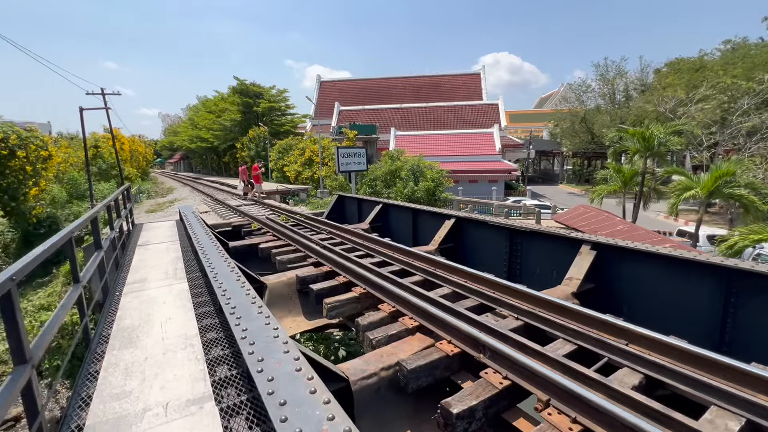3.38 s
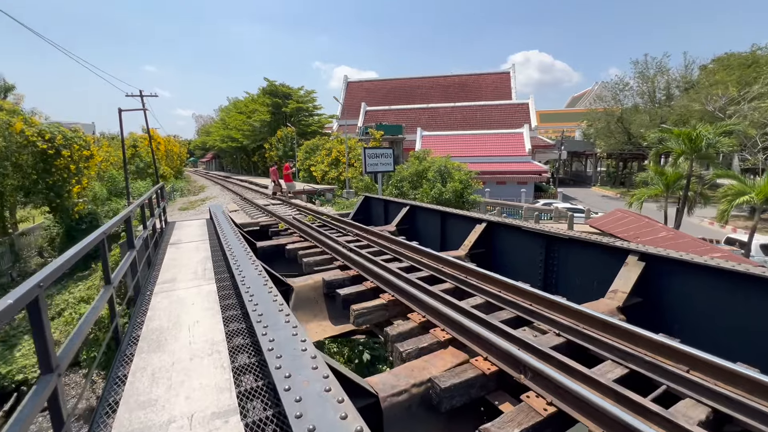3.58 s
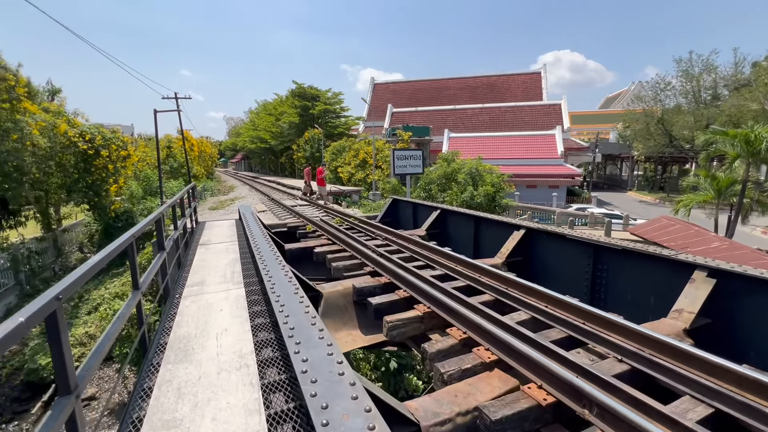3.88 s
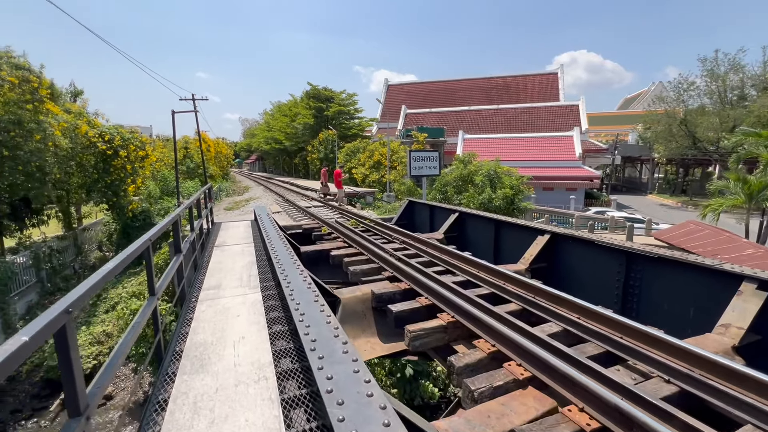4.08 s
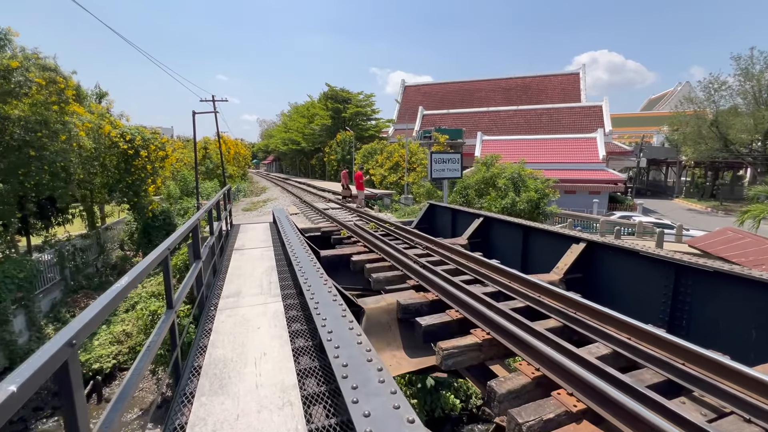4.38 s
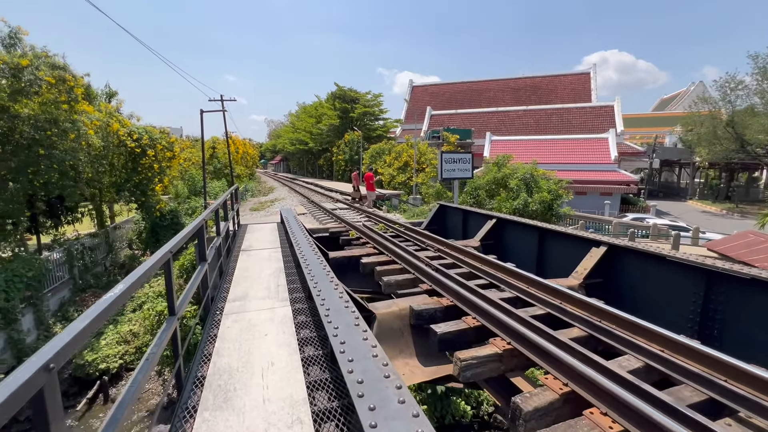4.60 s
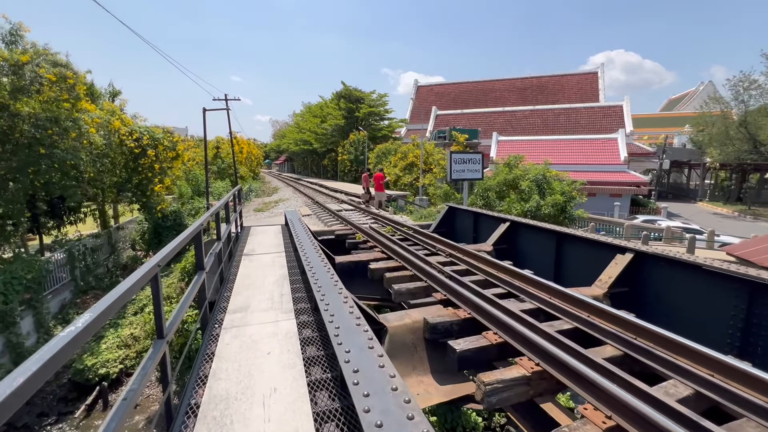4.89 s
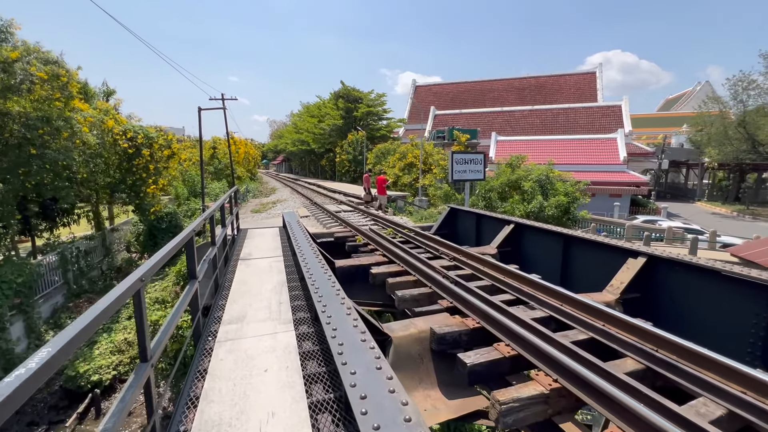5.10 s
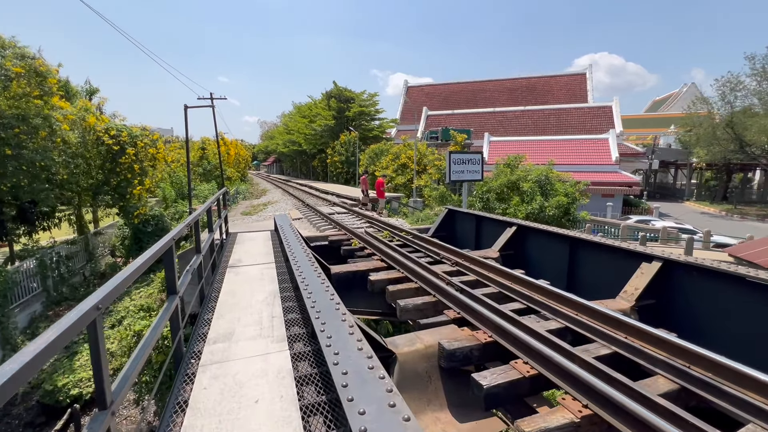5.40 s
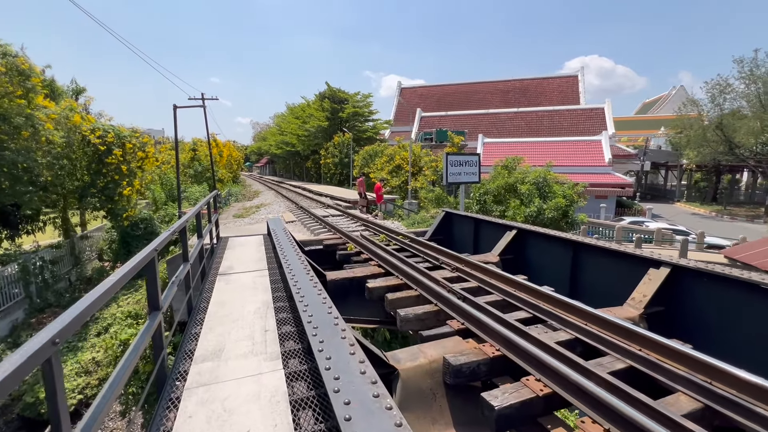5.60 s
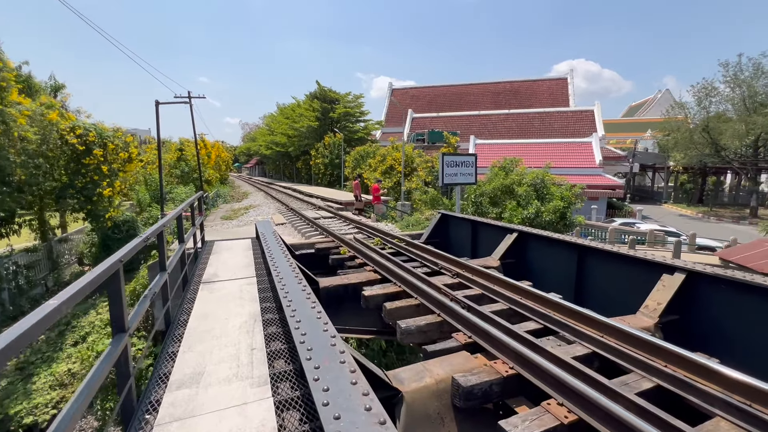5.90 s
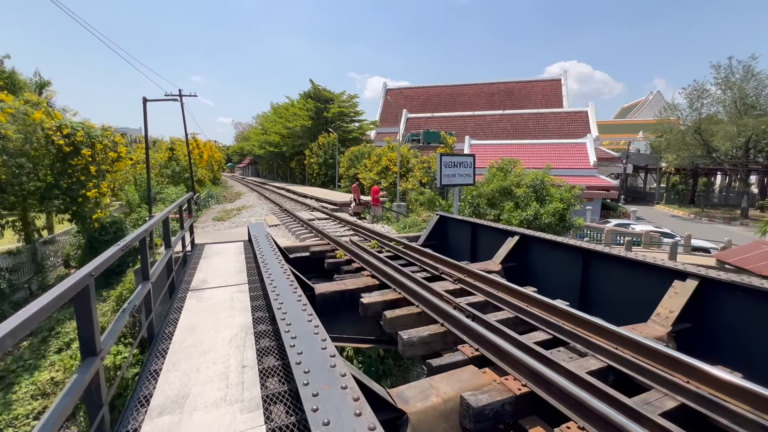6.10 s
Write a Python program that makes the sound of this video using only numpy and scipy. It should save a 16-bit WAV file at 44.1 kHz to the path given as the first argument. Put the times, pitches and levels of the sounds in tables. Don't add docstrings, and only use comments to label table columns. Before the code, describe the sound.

Outdoors on a steel railway bridge over a canal, the sound starts at full strength: a boat with an open exhaust passes right below, closest at about 0.2 s. Its steady low drone, near 84 firings a second, sits under a ragged, throbbing roar with bright spray. From 0.2 to 0.7 s the deck buzzes in a quick dry metallic rattle, strongest near 0.45 s. The boat then draws away, losing treble and level, its drone wavering but barely changing pitch. A grainy midrange echo blooms off the water around 0.8 s and again later. A hard hull slap lands at 1.5 s, softer ones at 2.6 and 3.3 s, with wash swelling around 2.2 s. A tiny sharp crack on the left comes at 4.8 s; faint grit ticks and a last splash come near 6 s. Town rumble and thin insect hiss stay behind. Close stereo, compact microphones.

```python
import sys
import numpy as np
from scipy import signal
from scipy.fft import rfft, irfft, next_fast_len
from scipy.io import wavfile

SR = 44100
rng = np.random.default_rng(int(sys.argv[2]) if len(sys.argv) > 2 else 0)


def gain_from_decibels(decibels):
    exponent = np.asarray(decibels, float) / 20
    return 10 ** exponent


def transcribe(u):
    v = np.clip(np.atleast_2d(u).T, -1, 1)
    q = np.round(v * 32767).astype(np.int16)
    wavfile.write(sys.argv[1], SR, q)


N = 275625
TIME = np.arange(N) / SR
PADDED = next_fast_len(N + 4096)
HZ = np.maximum(np.arange(PADDED // 2 + 1) * SR / PADDED, 1)

# frequency in Hz, boat in dB per Hz, surroundings in dB per Hz.
COLOUR_ROWS = [(32, -70, -80), (45.7, -43.5, -43.5), (110, -40.5, -44), (190, -40, -58), (291, -47, -60),
               (442, -52.5, -69), (664, -59, -65.5), (850, -60, -62), (1320, -61, -63.5),
               (2030, -62.5, -71.5), (3700, -69, -74.5), (6200, -67, -73), (7530, -69.5, -80),
               (11000, -65.5, -94.5), (15800, -70.5, -104)]
# frequency in Hz, lead in half turns, boat level in dB,
# boat likeness 0-1, surroundings level in dB, surroundings likeness 0-1.
PORT_ROWS = [(40, 0.024, -3.5, 0.84, -9.5, 0.06), (235, 0.29, -3.5, 0.98, -1.5, 0.77),
             (422, 0.54, -6, 0.84, 1.5, 0.99), (575, 0.92, -2, 0.32, 5, 0.96),
             (722, 0.87, 4, 0.25, -0.5, 0.56), (1046, 0.75, 2.5, 0.36, -3.5, 1),
             (1590, 1.04, 0, 0.3, -1.5, 0.7), (2900, 2.2, -1.5, 0, -3, 0.8),
             (4320, 2.96, -3.5, 0.13, -9, 0.54), (6460, 5.1, -9.5, 0, -16.5, 0.26),
             (8830, 5.83, 3.5, 0.12, -24, 0.8), (10240, 7.13, -1.5, 0.94, 4, 0.4),
             (11600, 8.33, -0.3, 1, -3, 0.9), (13850, 7.3, -5, 0.95, 5, .98),
             (15700, 10.0, 4, .98, 11, .98)]


def crank_angle():
    # time in seconds, firing rate in Hz.
    speed = [
        (0.0, 86.3),
        (0.1, 82.7),
        (0.61, 83.98),
        (1.08, 83.88),
        (1.2, 82.7),
        (1.65, 82.7),
        (1.78, 84.22),
        (6.25, 83.98),
    ]
    firing_hz, = in_time(speed)
    return np.pi * np.cumsum(firing_hz) / SR


def passage():
    closest_s, closest_m, boat_m_per_s = 0.23, 6.22, 7.3
    metres = np.hypot(closest_m, boat_m_per_s * (TIME - closest_s))
    return metres - closest_m, 20 * np.log10(metres / closest_m)


def order_levels(loss_db):
    # level at the closest point in dB, share of the spreading loss, flutter in dB.
    orders = [
        (-28, 0.36, -0.8),
        (-18, .45, 1.12),
        (-21, 0.48, 1.7),
        (-23.5, 0.47, 1.4),
    ]
    # time in seconds, half length in seconds, dB.
    fades = [
        [(0.1, .25, -4), (1.42, 0.15, -5), (2.3, .3, -3), (3.2, .3, -1), (4.35, .15, -4), (4.8, .06, -14),
         (5.6, .9, -6)],
        [(.1, 0.13, -2.5), (1.22, 0.15, -3), (1.6, 0.14, 3), (2.5, 0.19, 3.5), (3.3, 0.28, -2),
         (4.35, .25, 3.5), (5.26, 0.086, -8.5), (5.45, 0.048, -8), (5.83, 0.045, -5), (6.14, .04, -3)],
        [(.08, 0.12, -10), (.55, 0.25, 3), (.98, 0.091, -16), (1.2, 0.047, 5), (1.65, .27, -17),
         (2.2, 0.12, -16), (2.6, 0.21, -7), (3.05, 0.18, -3.5), (3.38, 0.061, -6), (3.7, .15, 3),
         (4.2, .07, -7), (4.7, 0.37, -15), (6.02, 0.15, 4), (6.25, .05, -16)],
        [(.08, 0.035, -3), (.3, 0.14, 5), (1.62, .12, 2.5), (2.03, 0.13, -6.5), (2.7, 0.28, -6),
         (3.25, 0.14, -12), (4.45, 0.18, -18), (5.6, .06, -5), (5.95, 0.15, -12)],
    ]
    flutter_per_s = 6.3
    return [db - share * loss_db + bumps(rows) + flutter_db * drift(flutter_per_s)
            for (db, share, flutter_db), rows in zip(orders, fades)]


def drone(crank, levels_db, exhaust_db, under):
    order_lag = [(2.4, 0, .25), (0, 0, 0), (0, -2.8, .5), (-.3, 2.8, .45)]
    # multiple of crank rate, level against the exhaust roar in dB.
    upper = [(1.5, -22), (2.5, -32), (3.5, -10.5), (5, -13.5), (6, -15.5), (6.5, -12.5), (9, -16)]
    out = 0
    for order, level_db in enumerate(levels_db, 1):
        open_lag, bridge_lag, wander = order_lag[order - 1]
        lag = open_lag + bridge_lag * under ** 2 + wander * drift(.6)
        out = out + gain_from_decibels(level_db + 0.95) * np.cos(order * crank - lag)
    for order, level_db in upper:
        level = gain_from_decibels(exhaust_db + level_db + 2.6 * drift(7.0))
        out = out + level * np.cos(order * crank + 1.64 * drift(1.22))
    shaft = 1 + 0.039 * np.cos(crank / 4)
    return gain_from_decibels(-0.5) * np.sqrt(2) * out * shaft


def roar_levels(metres, loss_db):
    # level at the closest point in dB, share of the spreading loss, air loss in dB per m,
    # share of surges.
    layers = [
        (-19.5, 0.84, 0.17, 1.0),
        (-25, 0.86, 0.17, 0.37),
        (-32, 0.65, 0.13, 0.39),
        (-37, 1, 0.12, 0.43),
    ]
    # time in seconds, half length in seconds, dB.
    surges = [(.01, 0.016, 4), (.07, .025, -1), (.12, 0.015, 2.5), (.17, 0.024, -0.5), (.27, 0.023, -3),
              (.36, 0.022, 4.5), (.43, .015, 3), (.52, 0.073, 0.5), (.67, 0.026, -1), (.95, 0.028, -0.5),
              (1.15, .3, -1.5), (1.55, .05, 2), (1.78, 0.067, 1.5), (2.9, 0.7, 1.5), (2.73, 0.02, -4),
              (2.97, 0.063, 2), (3.35, .12, 0), (4.58, 0.035, 2.5), (5.3, 0.56, -3.5), (6.1, 0.12, 3)]
    # time in seconds, half length in seconds, dB.
    breakers = [
        (.98, 0.051, 2),
        (1.7, 0.052, 3.5),
        (2.2, 0.27, 4),
        (2.4, 0.47, 3.5),
        (3.3, 0.46, 0),
        (6.0, .02, 7),
        (6.2, 0.16, 4.5),
    ]
    breaker_shares = [0.0, .1, .6, 1.1]
    surge_db, breaker_db = bumps(surges), bumps(breakers)
    return [db - share * loss_db - air * metres + surging * surge_db + breaking * breaker_db
            for (db, share, air, surging), breaking in zip(layers, breaker_shares)]


def roar(crank, levels_db):
    # frequency in Hz, width in Hz, dB.
    body = [(281, 30, 1), (380, 30, 4), (506, 24, 3), (850, 57, 2.5), (1370, 170, 3.5), (2260, 110, 3),
            (3800, 350, 4)]
    splits_hz = [450, 3000, 9000]
    fired = np.diff(np.floor(crank / np.pi), prepend=0) > 0
    pulses = rng.standard_normal((2, N)) * fired * np.sqrt(SR / 84)
    white = rng.standard_normal((2, N))
    throb = 0.095 * np.cos(crank + 2.4)
    colour_db = in_pitch(COLOUR_ROWS)[0] + humps(body)
    together = drift(7.7)
    groups = np.zeros((4, 2, N))
    for (hz, hiss), (_, pulse) in zip(octave_parts(white, colour_db), octave_parts(pulses, colour_db)):
        share = np.clip(60 / hz, 0, .35)
        band = np.sqrt(share) * pulse + np.sqrt(1 - share) * hiss * (1 + throb * (hz > 400))
        gust_db = 0.18 * together + 1.54 * drift(3.3)
        groups[np.searchsorted(splits_hz, hz)] += band * gain_from_decibels(gust_db)
    offsets_db = [1.6, 0.72, 0.9, 1.2]
    return sum(gain_from_decibels(level + more) * rms_one(g) for g, level, more in zip(groups, levels_db, offsets_db))


def water_echo(crank, loss_db):
    # time in seconds, half length in seconds, dB.
    blooms = [(.08, .07, 4), (.24, 0.023, 6), (.6, .1, 0), (.79, 0.075, 11), (1.1, .2, -10),
              (1.72, 0.11, 3.5), (2.3, 0.77, 6), (3.1, 0.28, -20), (3.34, 0.039, 11), (3.85, .04, 4),
              (4.07, .1, -3), (4.6, 0.18, 1), (5.28, 0.2, 7), (5.7, 0.073, -14), (5.9, .06, 8.5)]
    echo_hz, climb_hz_per_s, wander_hz = 864, 1.5, 12
    echo_db, loss_share, flutter_db = -34.5, 0.65, 2.0
    centre_hz = echo_hz + climb_hz_per_s * TIME + wander_hz * drift(2.5)
    level_db = echo_db - loss_share * loss_db + bumps(blooms) + flutter_db * drift(15)
    phase = 2 * np.pi * np.cumsum(centre_hz) / SR
    band = drift(80) * np.cos(phase) + drift(80) * np.sin(phase)
    return gain_from_decibels(level_db - 7.0) * band * (1 + 0.2 * np.cos(crank + 2.7))


def hull_slaps():
    # time in seconds, peak in dB, frequency in Hz, t60 in seconds.
    slaps = [
        (1.523, -5, 211, 0.12),
        (1.545, -8.5, 273, 0.1),
        (2.569, -21, 102.1, .12),
        (3.343, -9.5, 110, 0.094),
        (3.335, -31, 776, .1),
        (3.81, -33, 692, 0.23),
        (3.835, -32.5, 850, 0.22),
    ]
    cushion = np.hanning(90) / 45
    out = np.zeros(N)
    for s, db, hz, t60 in slaps:
        click = clicks_at([s], db)
        if hz < 400:
            click = np.convolve(click, cushion)[:N]
        out += ring(click, hz, t60)
    return out


def rattle_hits(count=21):
    first_s, turn_s, jitter_s = .1894, .0237, 0.0016
    loudest_s, peak_db, rise_db_per_s, fall_db_per_s = 0.46, -11, 47, 95
    off_turn_db = -4
    turn = np.arange(count)
    s = first_s + turn_s * turn + jitter_s * rng.uniform(-0.92, 1, count)
    away_db = np.maximum(rise_db_per_s * (loudest_s - s), fall_db_per_s * (s - loudest_s))
    return np.transpose([s, peak_db - away_db + off_turn_db * (turn % 2)])


def deck_rattle():
    # frequency in Hz, level in dB, t60 in seconds.
    modes = [(3520, -25.5, 0.0059), (3820, -26, 0.018), (5900, -29, 0.032), (6670, -29, 0.024),
             (8280, -34, 0.019), (10140, -20.5, 0.012), (11620, -28, 0.015), (14200, -33, 0.01)]
    hits = rattle_hits()
    out = gain_from_decibels(-14) * burst(hits, .005, 3500)
    for hz, level_db, t60 in modes:
        uneven_db = rng.normal(0, 3.7, len(hits))
        scraped = hits + np.outer(level_db + uneven_db, [0, 1])
        out += ring(burst(scraped, 0.0026, 2500), hz, t60)
    return out


def grit_ticks():
    # time in seconds, peak in dB.
    ticks = [
        (5.995, -28),
        (6.003, -28),
        (6.015, -30),
        (6.054, -28),
    ]
    # frequency in Hz, width in Hz, dB.
    grit_tone = [(10800, 4500, 12.5)]
    return filtered(burst(ticks, 0.0019, 7000), gain_from_decibels(humps(grit_tone) - 14))


def deck_crack():
    # time in seconds, peak in dB.
    cracks = [
        (4.818, -25),
    ]
    return burst(cracks, .0012, 10550)


def surroundings():
    white = rng.standard_normal((2, N)) * np.sqrt(SR / 2)
    parts = octave_parts(white, in_pitch(COLOUR_ROWS)[1] - 1.5)
    return sum(band * gain_from_decibels(0.88 * drift(12)) for _, band in parts)


def boat_bearing():
    # time in seconds, share from under the bridge 0-1, drone left minus right in dB.
    bearing = [
        (0, 0.88, 3.5),
        (.7, 0.71, 3.5),
        (1.3, 0.88, 2.5),
        (1.8, 0.66, 3.5),
        (2.3, 0.04, 1.5),
        (3.2, 0.02, 3.5),
        (4.2, 0, 1.5),
        (5.2, 0, 3),
        (5.8, 0.24, 2.5),
        (6.25, 0.3, 2),
    ]
    under, pan_db = in_time(bearing)
    return np.clip(under, 0, 1), pan_db


def ports(direct, scattered, right_db, likeness, under):
    # frequency in Hz, lead in half turns.
    under_rows = [(40, .01), (250, 0.026), (400, 0.28), (600, 0.82), (900, 0.45), (1500, 0.35),
                  (2200, 0.078), (4200, .05), (6200, 0.9), (8500, 2.17)]
    alike = np.clip(likeness, 0, 1)
    lead, under_lead = lead_of(PORT_ROWS[:-4], 0), lead_of(under_rows, 2)
    paths = np.array([direct * np.sqrt(1 - under), direct * np.sqrt(under), scattered])
    unlike = np.sqrt(1 - alike ** 2) * np.ones(len(HZ))
    weights = gain_from_decibels(right_db) * np.array([alike * lead, alike * under_lead, unlike])
    return np.array([direct, filtered(paths, weights).sum(axis=0)])


def lead_of(rows, turns_less):
    # frequency in Hz, lead in half turns.
    top_lead = [(10250, 7), (11900, 8), (13750, 9), (15550, 10)]
    top = np.array(top_lead) - [0, 2 * turns_less]
    hz, half_turns = np.vstack([np.array(rows)[:, :2], top]).T
    return np.exp(1j * np.pi * np.interp(HZ, hz, half_turns))


def octave_parts(x, colour_db):
    # frequency in Hz, width in Hz, dB.
    gaps = [(42, 15, -5), (84.4, 8.6, -16.5), (122, 9.3, -2.5), (168, 19, -2)]
    spectrum = rfft(x, PADDED) * gain_from_decibels(colour_db + humps(gaps))
    for centre_hz in 45 * 2 ** np.arange(9):
        away = np.clip(np.log2(HZ / centre_hz), -1, 1)
        yield centre_hz, irfft(spectrum * np.cos(np.pi / 2 * away) ** 2, PADDED)[:, :N]


def burst(rows, decay_s, low_hz):
    s, db = np.transpose(rows)
    decay = np.exp(-1 / (decay_s * SR))
    puffs = signal.lfilter([1], [1, -decay], clicks_at(s, db)) * rng.standard_normal(N)
    return signal.sosfilt(signal.butter(2, low_hz, "high", fs=SR, output="sos"), puffs)


def ring(clicks, hz, t60):
    r, w = gain_from_decibels(-60 / (t60 * SR)), 2 * np.pi * hz / SR
    return signal.lfilter([0, np.sin(w)], [1, -2 * r * np.cos(w), r * r], clicks + 1e-18)


def clicks_at(times_s, levels_db):
    out = np.zeros(N)
    out[(np.asarray(times_s) * SR).astype(int)] = gain_from_decibels(levels_db)
    return out


def drift(rate_hz):
    r = np.exp(-80 * np.pi * rate_hz / SR)
    slow = signal.lfilter([1], [1, -2 * r, r * r], rng.standard_normal(N // 40 + 2002))[2000:]
    return np.interp(np.arange(N) / 40, np.arange(len(slow)), rms_one(slow - slow.mean()))


def rms_one(x):
    return x / np.sqrt(np.mean(x ** 2) + 1e-20)


def bumps(rows):
    coarse = TIME[::40]
    total_db = sum(db * np.exp(-((coarse - s) / half_s) ** 2) for s, half_s, db in rows)
    return np.interp(TIME, coarse, total_db)


def humps(rows):
    return sum(db / (1 + (2 * (HZ - hz) / width_hz) ** 2) for hz, width_hz, db in rows)


def filtered(x, response):
    return irfft(rfft(x, PADDED) * response, PADDED)[..., :N]


def in_time(rows):
    s, *columns = np.transpose(rows)
    return [np.interp(TIME, s, c) for c in columns]


def in_pitch(rows):
    hz, *columns = np.transpose(rows)
    return [np.interp(np.log(HZ), np.log(hz), c) for c in columns]


def scene():
    crank = crank_angle()
    metres, loss_db = passage()
    under, pan_db = boat_bearing()
    boat_db, boat_alike, far_db, far_alike = in_pitch(PORT_ROWS)[1:]
    roar_db = roar_levels(metres, loss_db)

    tone = drone(crank, order_levels(loss_db), roar_db[0], under)
    swaying = filtered(tone, 1j) * np.tanh(drift(1.1))
    engine = ports(tone, swaying, 0, 0.83, under / 2) * gain_from_decibels([0 * pan_db, -pan_db])

    direct, scattered = roar(crank, roar_db)
    hits = water_echo(crank, loss_db) + hull_slaps() + deck_rattle() + grit_ticks()
    boat = ports(direct + hits, scattered + hits, boat_db, boat_alike, under)

    engine[0] += deck_crack()
    return engine + boat + ports(*surroundings(), far_db, far_alike, 0)


def band_limit(x):
    return signal.sosfilt(signal.butter(12, 17110, fs=SR, output="sos"), x)


def record(dry):
    cut = signal.sosfilt(signal.butter(2, 30, "high", fs=SR, output="sos"), dry)
    rounded = cut / (1 + cut ** 8) ** .125
    top_hz = 15870
    return band_limit(filtered(rounded, HZ < top_hz))


dry = scene()
out = record(dry)
transcribe(out)
```